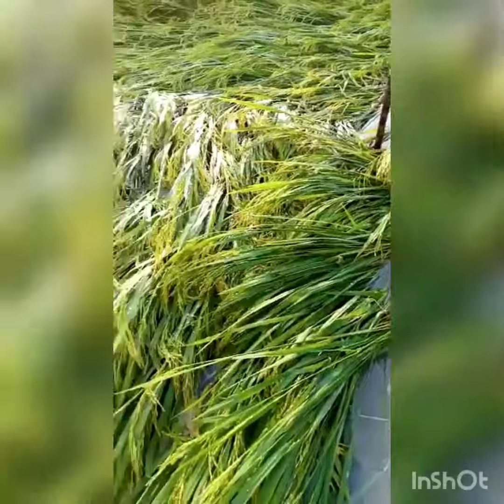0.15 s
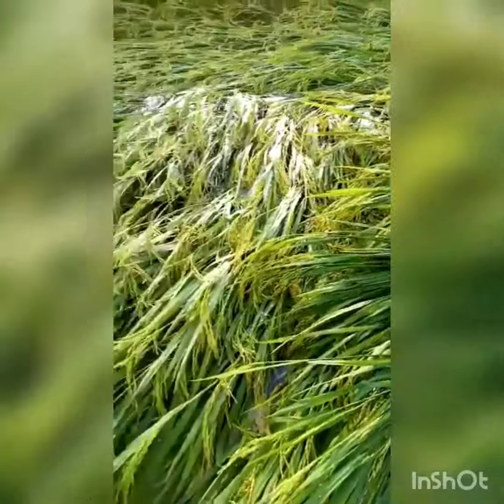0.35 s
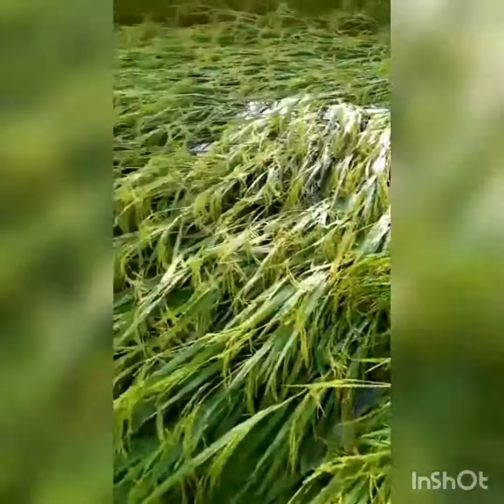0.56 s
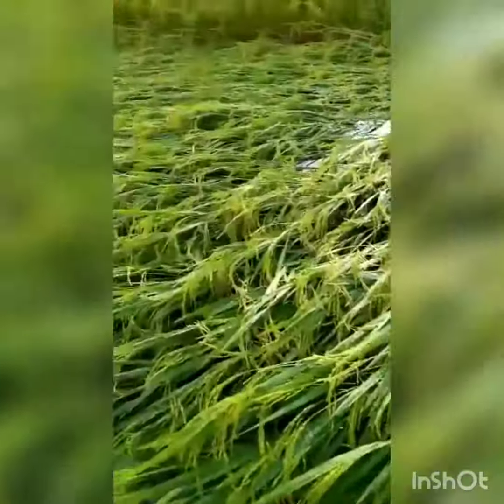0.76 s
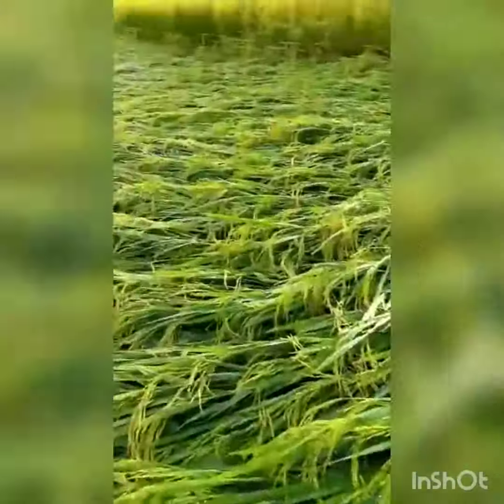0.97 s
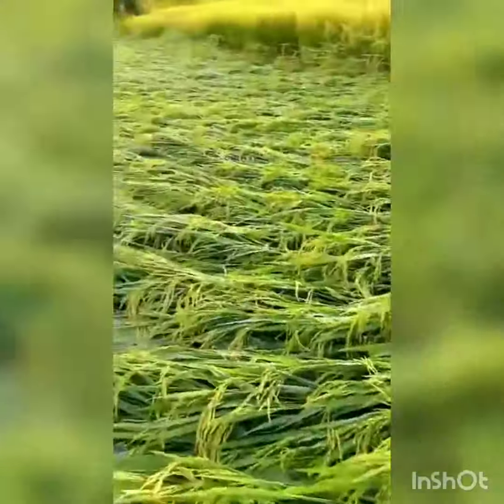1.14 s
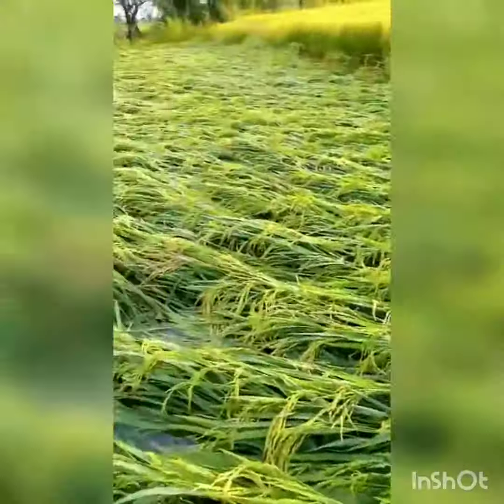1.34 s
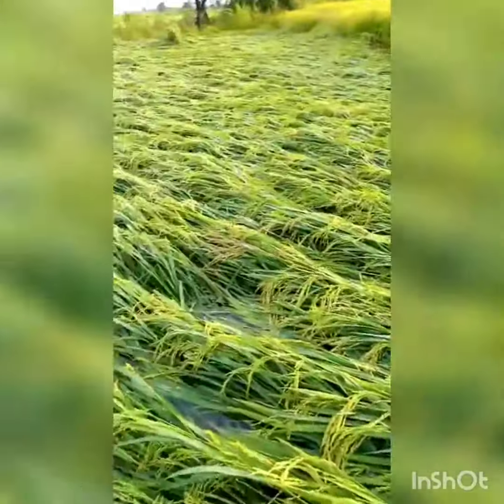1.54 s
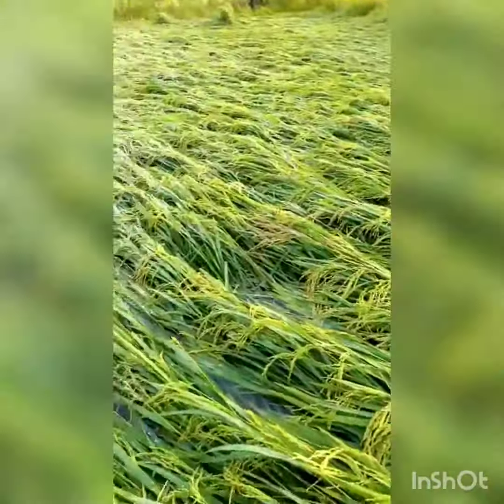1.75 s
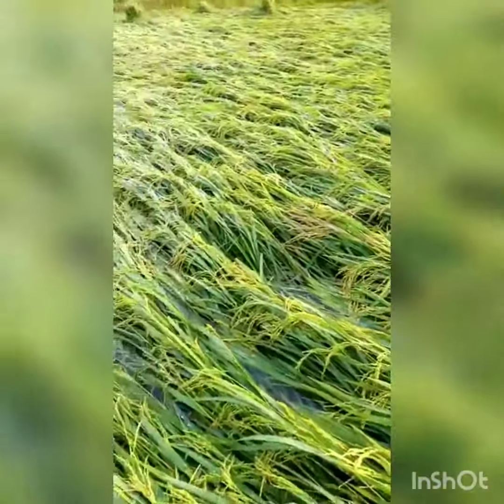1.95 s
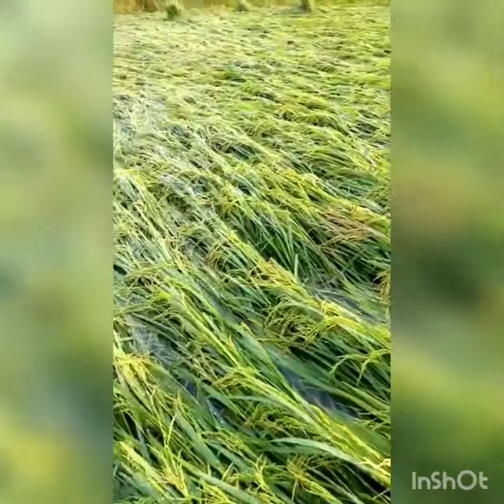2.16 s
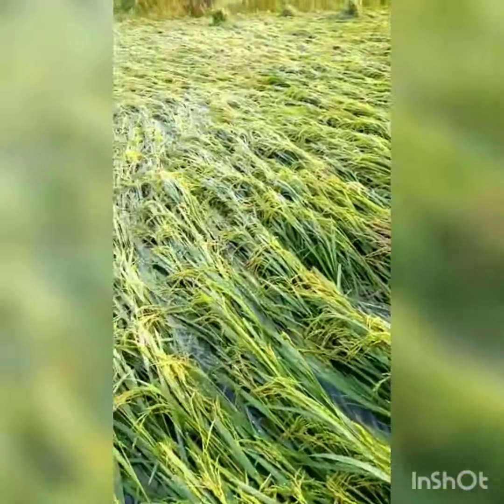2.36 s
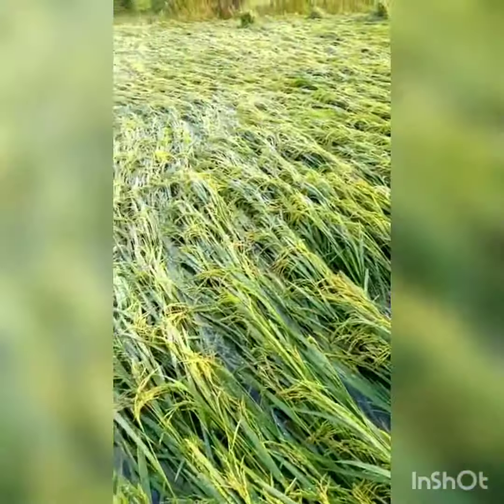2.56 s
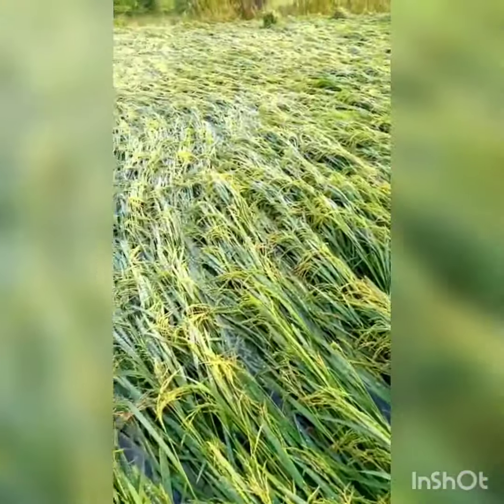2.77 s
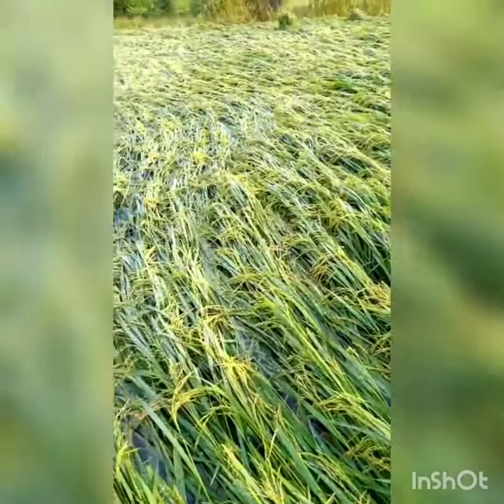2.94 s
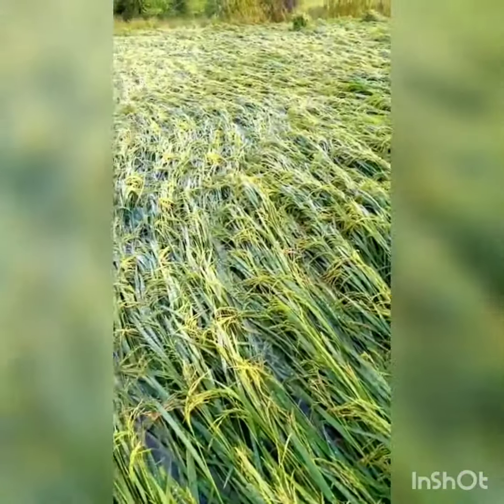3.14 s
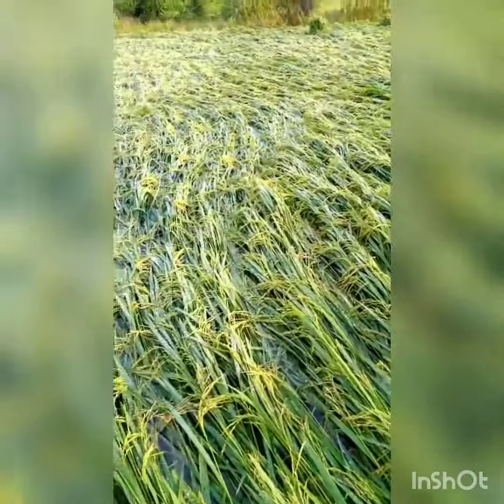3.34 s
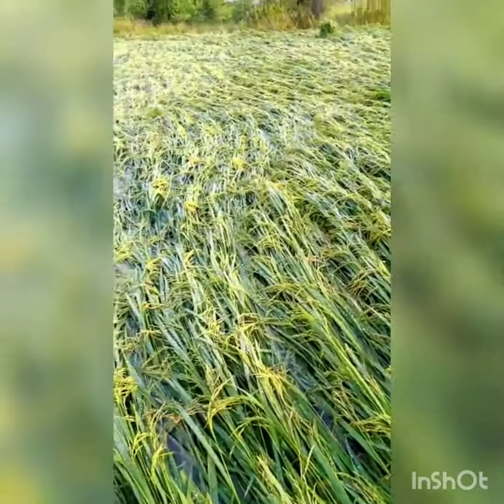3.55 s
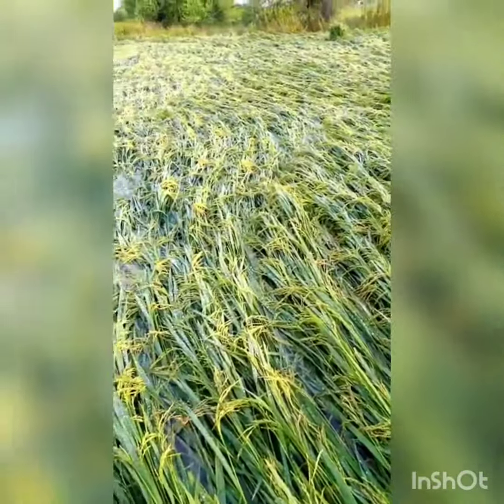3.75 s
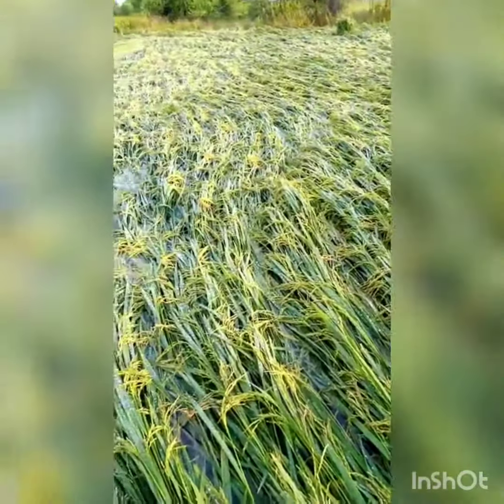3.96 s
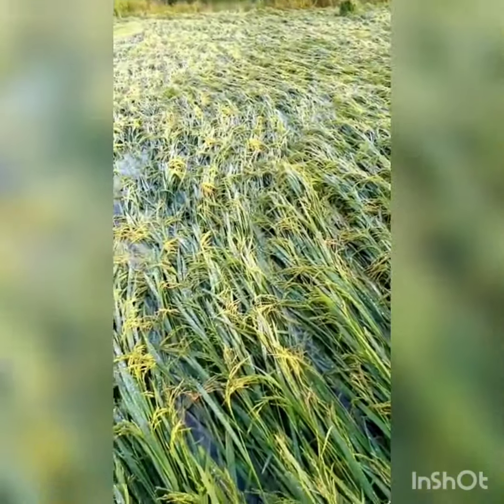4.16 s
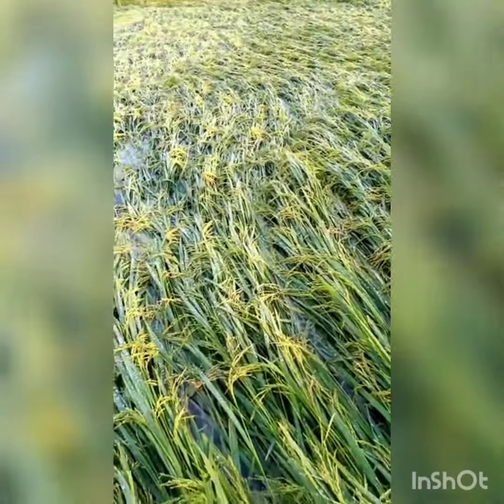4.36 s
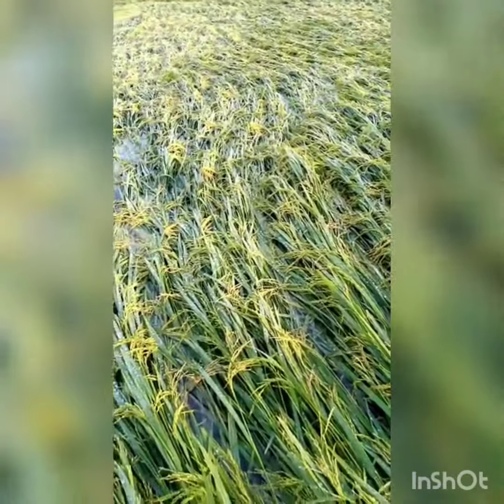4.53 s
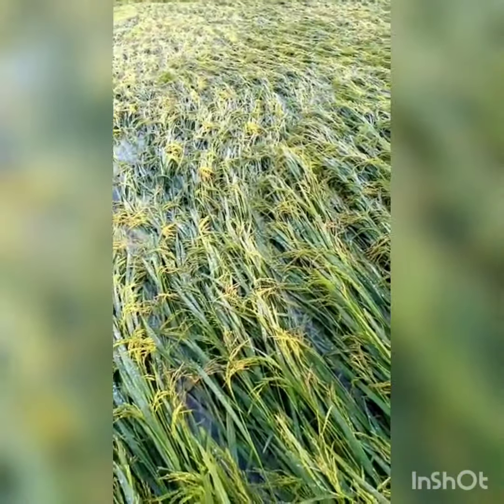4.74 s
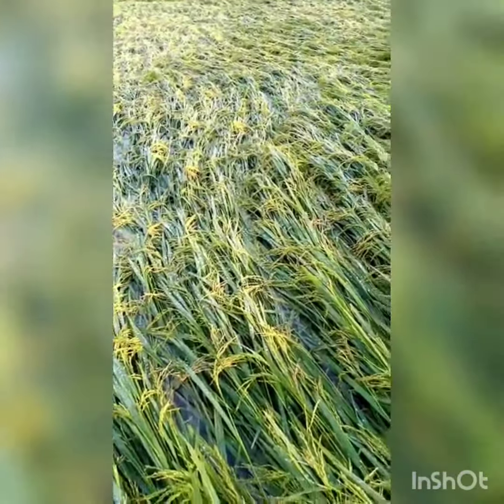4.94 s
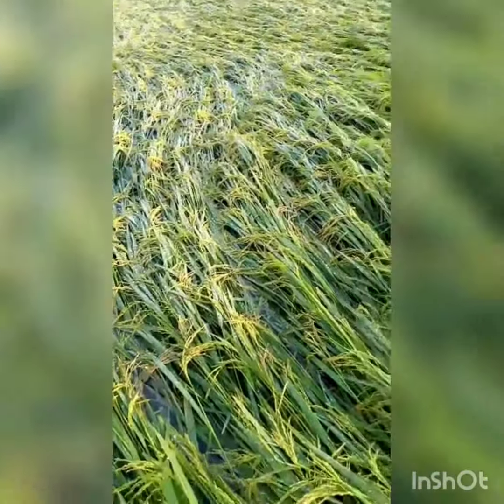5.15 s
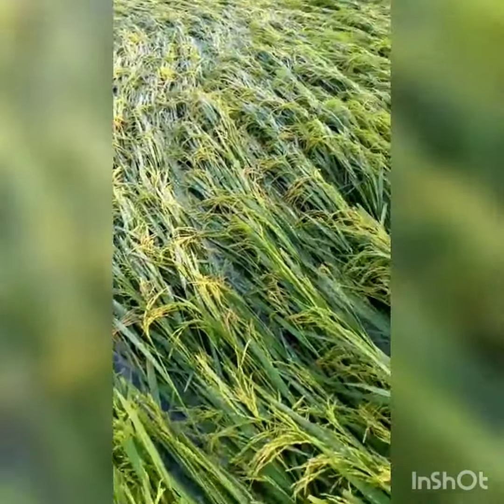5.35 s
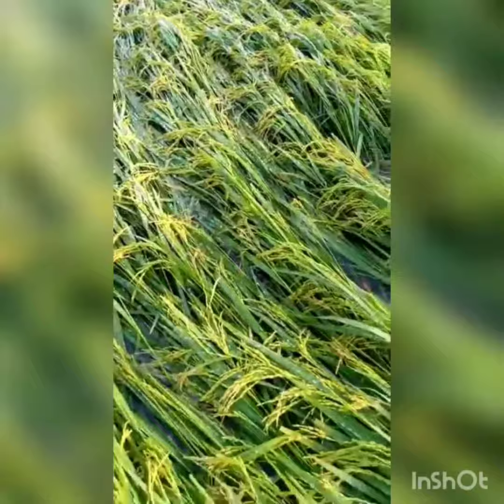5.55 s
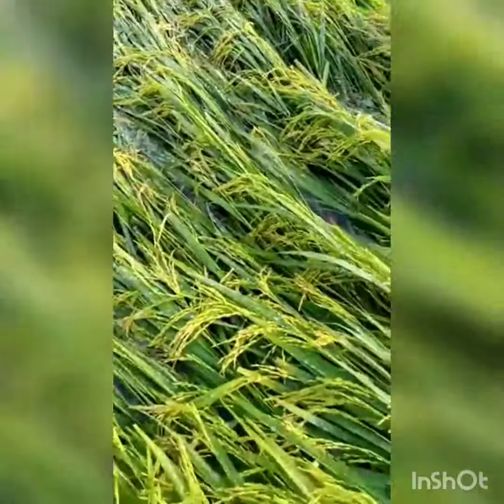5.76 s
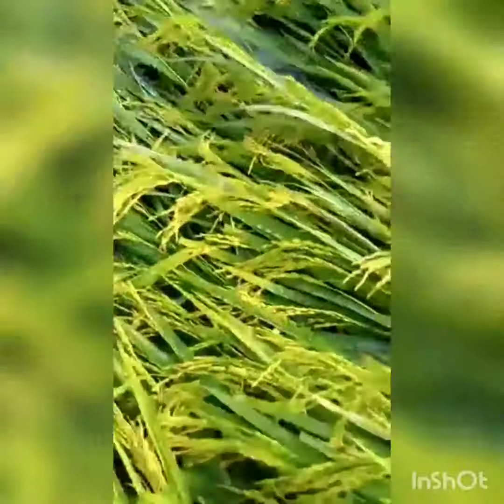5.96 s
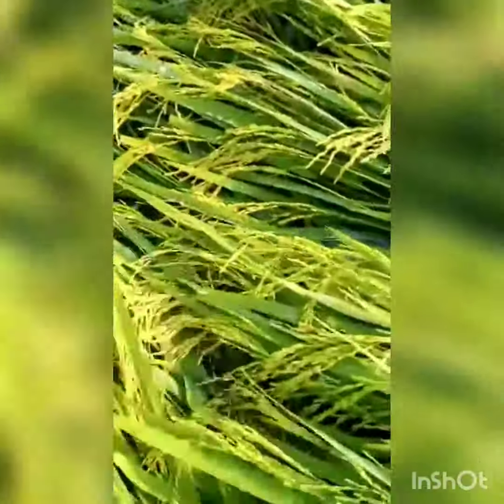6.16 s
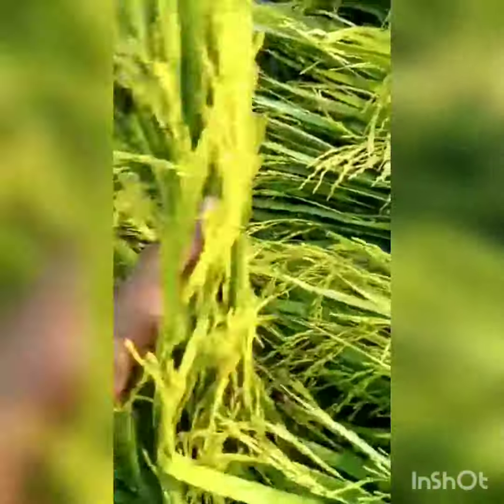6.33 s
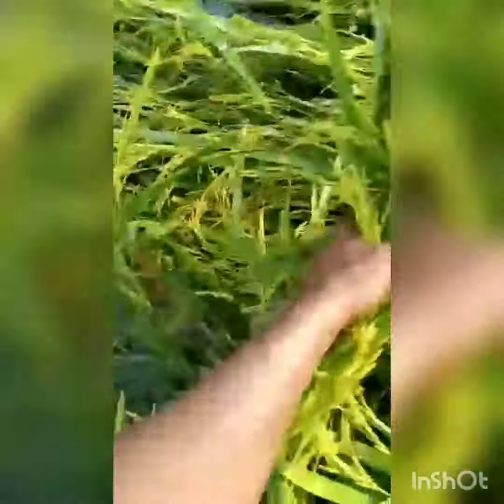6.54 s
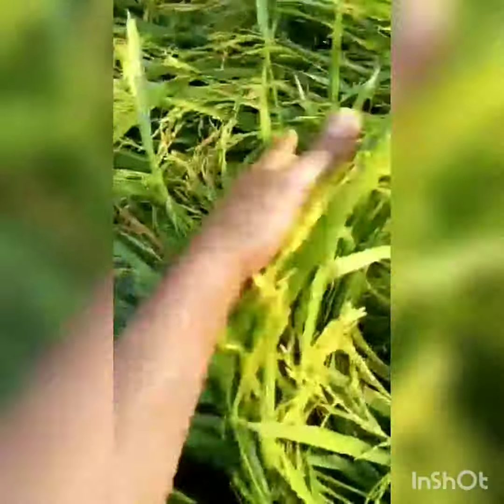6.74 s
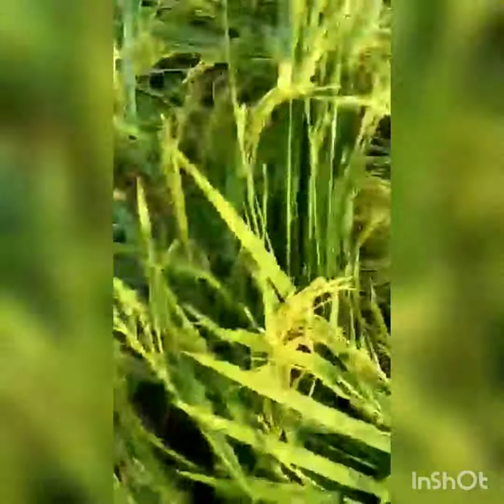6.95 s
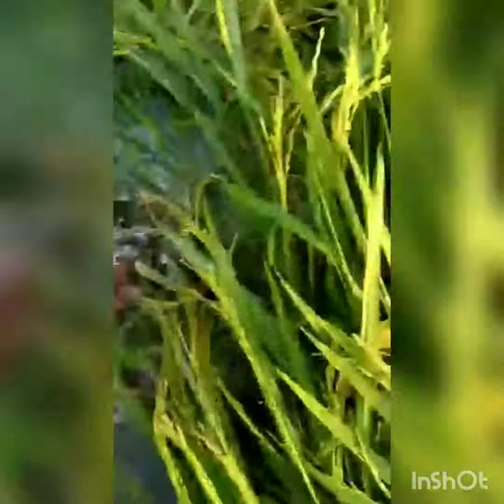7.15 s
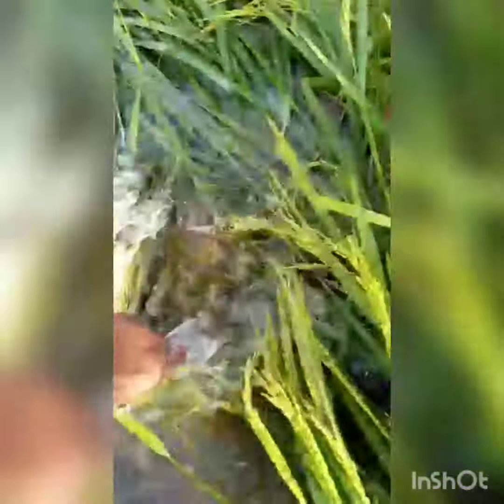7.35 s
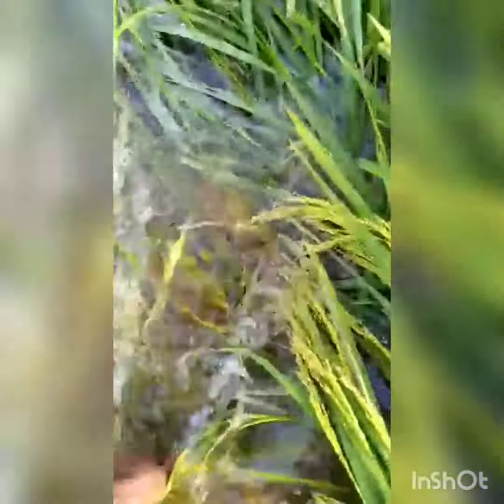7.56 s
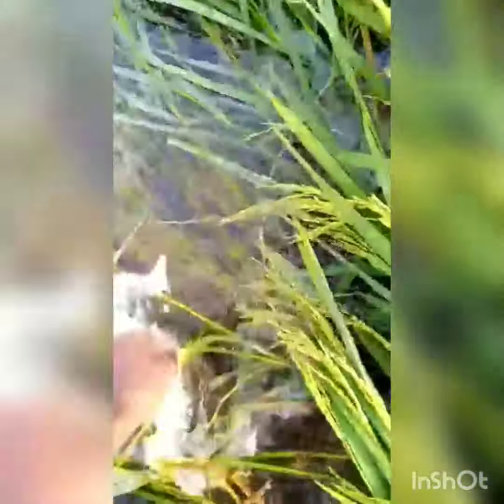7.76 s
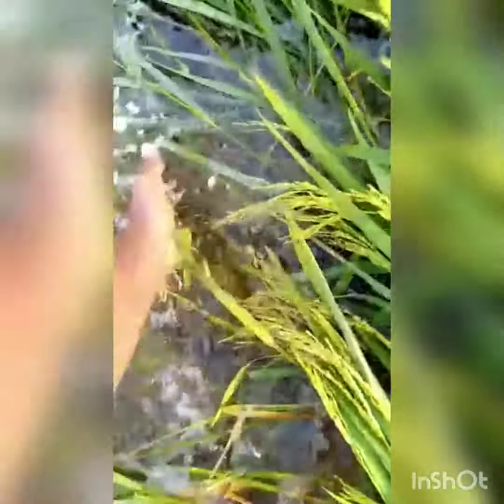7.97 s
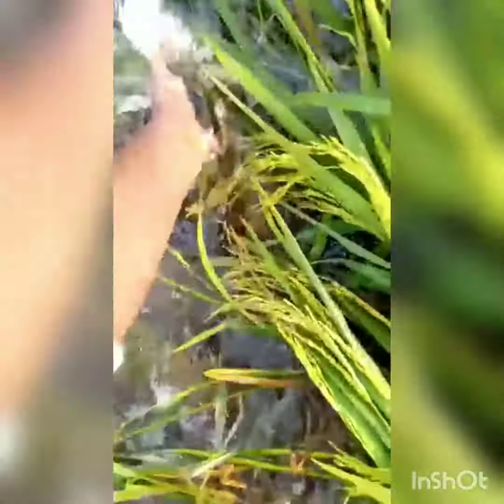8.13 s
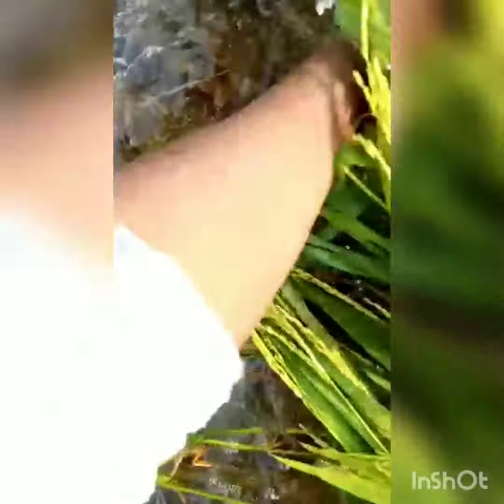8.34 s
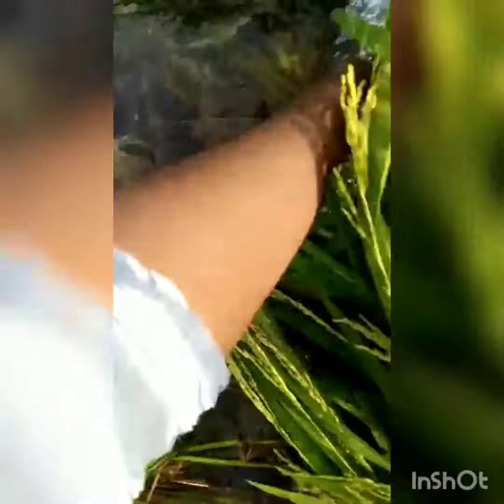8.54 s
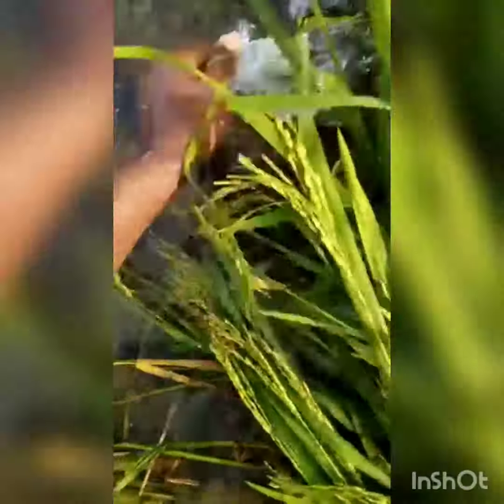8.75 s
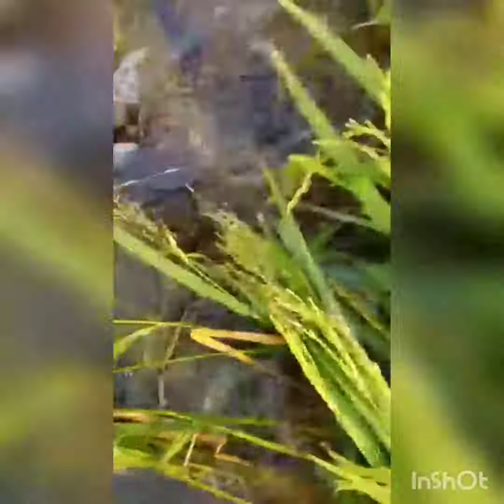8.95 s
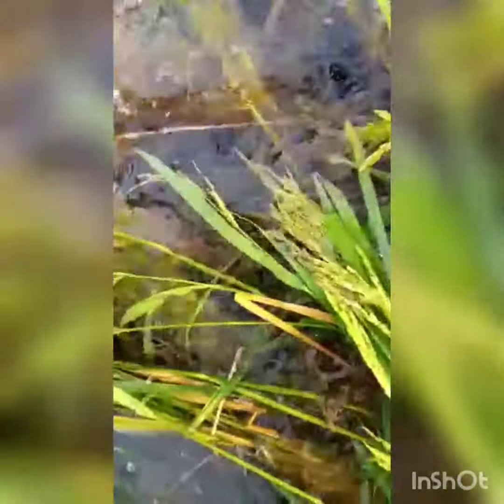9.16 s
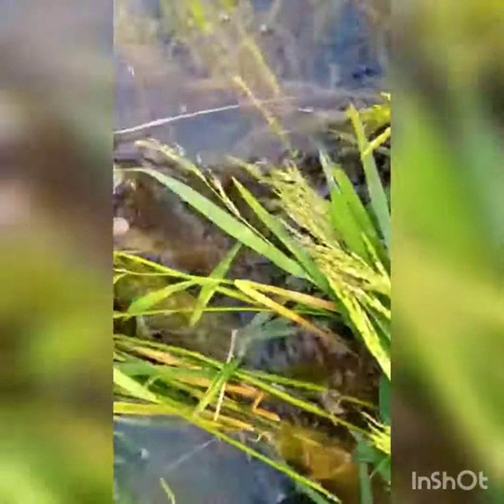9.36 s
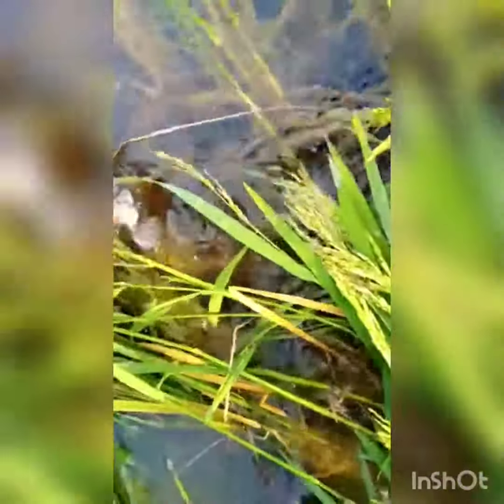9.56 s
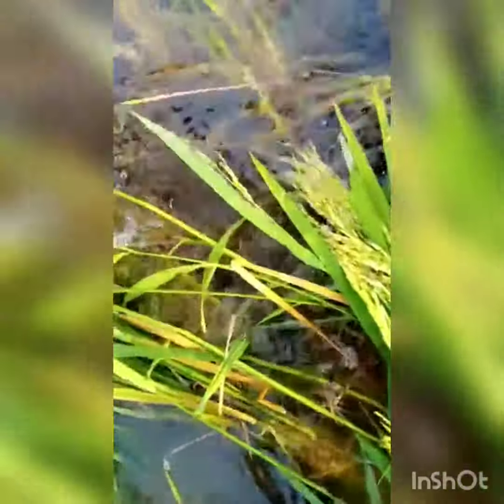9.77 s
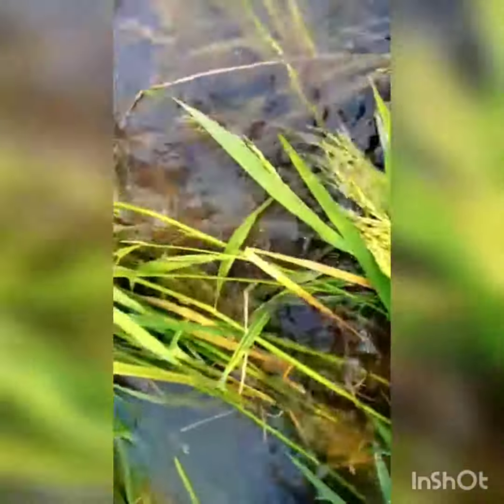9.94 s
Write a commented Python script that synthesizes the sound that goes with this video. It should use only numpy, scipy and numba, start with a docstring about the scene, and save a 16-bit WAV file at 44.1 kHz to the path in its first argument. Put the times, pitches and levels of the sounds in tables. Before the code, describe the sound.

Outdoors in a flooded rice field, a near cricket chirps rapidly and steadily, high and thin, with a lower cricket, distant insects and faint falling bird whistles behind it. Wet leaves tick and crackle softly. Just before six seconds a hand sweeps the stalks in a loud, bright swish, then paddles in shallow water with splashes, slaps, glugs and bubbles. Close, plain phone microphone, slight hiss.

```python
"""Flooded field of flattened rice, open air, one phone microphone: a near cricket chirps in beating
sine strokes; a lower cricket, noise-band crickets and a whistling bird are further off. Wet leaves
tick and brush as crackling noise. Then a hand sweeps the stalks and paddles in the shallow water:
shaped noise swishes, sprays and churns, while damped rings of rising pitch bubble, glug and slap."""
import sys
import numpy as np
from scipy import signal
from scipy.fft import rfft, irfft
from scipy.io import wavfile
from scipy.ndimage import uniform_filter1d
from numba import njit

SR = 44100
rng = np.random.default_rng(int(sys.argv[2]) if len(sys.argv) > 2 else 0)


def generate_wav(signal):
    """Clip the signal to [-1, 1] and save it as 16-bit WAV at the path in sys.argv[1]."""
    frames = np.transpose(np.atleast_2d(signal))
    scaled = np.clip(frames, -1, 1) * 32767
    pcm = np.round(scaled).astype(np.int16)
    wavfile.write(sys.argv[1], SR, pcm)


N = 441000

# spectrum of brushed stalks and leaves: freq_hz, relative_level_db
SWISH_SPECTRUM = [(410, -41), (700, -30), (958, -4), (1400, 3.5), (1600, 0.5), (2020, 1), (3370, -5),
                  (6570, -3.5), (7300, -8.5), (8100, -13), (10100, -9.5), (13500, -21), (15200, 4),
                  (16000, -11)]


def undb(db):
    """Decibels to amplitude."""
    return 10 ** (np.asarray(db) / 20)


def unit(x):
    """Scale to rms 1."""
    return x / np.sqrt(np.mean(x ** 2))


def curves(table):
    """Table columns as sample-by-sample lines, and a mask of the time covered, eased at its ends."""
    s, *columns = np.transpose(table)
    t = np.arange(N) / SR
    mask = np.clip(np.minimum(t - s[0] + 0.016, s[-1] + 0.036 - t) / 0.026, 0, 1)
    return [np.interp(t, s, c) for c in columns], mask


def band(x, lo_hz, hi_hz):
    """Steep band-pass."""
    sos = signal.butter(3, [lo_hz, min(hi_hz, .45 * SR)], "band", fs=SR, output="sos")
    return signal.sosfilt(sos, x)


def colour(x, table):
    """Shape the spectrum by (Hz, dB) points, straight lines over log frequency."""
    hz, db = np.transpose(table)
    f_hz = np.arange(N // 2 + 1) * SR / N + 1
    return irfft(rfft(x) * undb(np.interp(np.log(f_hz), np.log(hz), db)), N)


def walk(rate_hz):
    """Random levels, a new one rate_hz times a second, joined by slews; spread near 1.4."""
    k = int(SR / rate_hz)
    return 1.73 * uniform_filter1d(np.repeat(rng.standard_normal(N // k + 1), k), k)[:N]


def crackle(spread_db):
    """Noise with a few large samples among many small: dense snaps."""
    return rng.standard_normal(N) * undb(spread_db * rng.exponential(size=N))


@njit
def rings(start, hz, t60_s, size, glide, rise_cycles):
    """Damped sines that swell over rise_cycles; pitch shifts by fraction glide (up: bubble nears surface)."""
    out = np.zeros(N)
    for k in range(len(start)):
        n, phase, fade = int(t60_s[k] * SR), 0., 1.
        for i in range(min(n, N - start[k])):
            phase += hz[k] * (1 + glide * i / n) / SR
            fade *= 1 - np.log(1000) / n
            swell = min(phase / rise_cycles, 1.) ** 2
            out[start[k] + i] += size[k] * np.sin(2 * np.pi * phase) * fade * swell
    return out


def ring_table(s, db, hz, t60_s, glide, rise_cycles):
    """Rings from seconds and dB; the dB are ahead of swell and decay."""
    return rings((s * SR).astype(np.int64), hz, np.maximum(t60_s, .002), undb(db), glide, rise_cycles)


def froth(lo_hz, hi_hz, cycles, spread_db, count):
    """Random crowd of rising bubble rings in the second half, rms 1 there; largest sizes capped."""
    u = rng.random((count, 4)).T
    start_s = (1 + u[0]) * N / SR / 2
    hz = lo_hz * (hi_hz / lo_hz) ** u[1]
    db = spread_db * np.minimum(-np.log(u[2]), 2.7)
    t60_s = cycles * (.5 + u[3]) / hz
    return unit(ring_table(start_s, db, hz, t60_s, 0.43, 4.53)) / np.sqrt(2)


def bursts(s, db, decay_s):
    """A short puff of noise that swells and dies at each time."""
    snap, t = np.zeros(N), np.arange(int(9 * decay_s * SR)) / SR
    snap[((s - decay_s / 2) * SR).astype(int)] = undb(db)
    envelope = signal.fftconvolve(snap, t / decay_s * np.exp(1 - t / decay_s))[:N]
    return envelope * rng.standard_normal(N)


def air():
    """Open-air hush with the microphone's own hiss, and low noise puffs as the arm moves air onto it."""
    # hush: freq_hz, relative_level_db
    hush_spectrum = [(25, -20.5), (80, -7.5), (160, -12), (1130, -22.5), (2990, -23), (4870, -26.5),
                     (5430, -25), (6560, -2), (7310, -27), (8140, -26), (9070, -39), (12500, -43),
                     (16000, -25)]
    # puffs: time_s, level_db (before the bass filter)
    puffs = [(6.749, -44), (7.449, -33), (7.779, -33), (8.11, -34.5), (9.059, -50)]
    hush_db = -70.5 + 0.16 * walk(3.5)
    hush = unit(colour(rng.standard_normal(N), hush_spectrum)) * undb(hush_db)
    return hush + band(bursts(*np.transpose(puffs), 0.025), 44, 110)


def chorus():
    """Far crickets merge into narrow noise bands with fluttering levels."""
    # lower band: time_s, level_db
    far_levels = [(0, -70), (1.2, -84), (1.9, -69), (2.4, -75), (3.5, -74.5), (5.6, -89)]
    (far_db,), _ = curves(far_levels)
    flutter_db = 3 * walk(110) + 4 * walk(18)
    far = unit(band(rng.standard_normal(N) * undb(flutter_db), 6050, 6600)) * undb(far_db)
    high_db = -84 + 3 * walk(40) + 1.5 * walk(3)
    high = unit(band(rng.standard_normal(N), 7750, 8450)) * undb(high_db)
    return far + high


def bird():
    """Short falling sine whistles blurred by echoes from across the field, over faint distant twitter."""
    # notes: time_s, level_db (before the mix), pitch_hz (40% through the note)
    tweets = [(0.571, -66, 3230), (0.806, -64, 3220), (0.864, -61, 3050), (1.568, -68, 3170),
              (1.626, -67, 3160), (1.775, -73, 3770), (1.8437, -70, 3200), (1.9006, -67, 3150),
              (2.23, -76, 3200), (2.28, -70, 4570), (2.2937, -72, 3110), (2.615, -71, 3120),
              (2.98, -76, 3000), (3.37, -75, 3080), (3.4211, -70, 2960), (3.725, -77, 3100),
              (3.9519, -72, 3810), (4.035, -76, 3100), (4.1694, -76, 3640), (4.6694, -78, 3150),
              (4.805, -78, 3870), (4.9536, -78, 3160), (5.2007, -73.5, 3150), (5.26, -73, 3110),
              (5.325, -75, 3090)]
    out, t = np.zeros(N), np.arange(int(0.03 * SR)) / SR
    through = t / t[-1]
    for s, db, hz in tweets:
        pitch_hz = hz + 400 * (.7 + .5 * rng.random()) * (.4 - through)
        swell = np.sin(np.pi * through ** 0.58) ** 0.54
        i = int((s - .008) * SR)
        out[i:i + len(t)] += undb(db) * swell * np.sin(2 * np.pi * np.cumsum(pitch_hz) / SR)
    echoes = rng.standard_normal(6000) * np.exp(-np.arange(6000) / 1360.0)
    u = rng.random((400, 3)).T
    hz, t60_s = 2850 + 2400 * u[2] ** 3, .08 + 0.12 * u[1]
    twitter = ring_table(u[0] * N / SR, -86 + 6 * u[1] ** 2, hz, t60_s, -.1, 90.)
    twitter *= undb(3 * walk(4))
    blurred = signal.fftconvolve(out + 2 * twitter, echoes)[:N]
    return .7 * out + .8 * twitter + undb(-29) * blurred


def chirp(db, wing_hz, length_s):
    """Each wing stroke swells and stops; two wings ring a little apart and beat; pitch climbs."""
    stroke_hz, rise_hz_per_s, beat_hz = 122, 1670, 190
    t = np.arange(int((length_s + 0.0057) * SR)) / SR
    chance = rng.standard_normal((4, 12))
    stroke = np.minimum((t * stroke_hz).astype(int), 11)
    phase = t * stroke_hz % 1
    swell = np.sin(np.pi * phase ** 0.92) ** 0.69 * undb(1.8 * chance[0, stroke])
    swell *= np.clip((length_s + 0.007 - t) / 0.0048, 0, 1)
    turns = (wing_hz + 15 * chance[3, 0] + rise_hz_per_s * (t - length_s) / 2) * t
    turns += 35 * chance[1, stroke] * phase / stroke_hz  # each stroke slightly off pitch
    second_wing = np.sin(2 * np.pi * (turns - beat_hz * t) + 3 * chance[2, stroke])
    wings = np.sin(2 * np.pi * turns) + 0.5 * second_wing
    return undb(db + chance[3, 1]) * swell * wings


def crickets():
    """A near cricket and a lower one further off, in its own rhythm; leaves scatter the calls into noise."""
    # near cricket's chirps: start_s
    chirps = [0.059, 0.152, 0.256, 0.362, 0.461, 0.571, 0.679, 0.797, 0.902, 1.005, 1.13, 1.238, 1.352,
              1.455, 1.567, 1.69, 1.791, 1.89, 2.005, 2.083, 2.197, 2.295, 2.393, 2.481, 2.578, 2.676,
              2.779, 2.879, 2.983, 3.084, 3.193, 3.301, 3.409, 3.519, 3.634, 3.74, 3.845, 3.982, 4.068,
              4.179, 4.267, 4.361, 4.46, 4.558, 4.65, 4.747, 4.855, 4.953, 5.053, 5.153, 5.256, 5.36, 5.467,
              5.582, 5.686]
    # near cricket's effort: time_s, level_db, chirp_length_s
    song = [(0.102, -60, 0.049), (.26, -54.5, 0.054), (0.57, -52.5, 0.048), (0.894, -56.5, 0.032),
            (1.1, -70, 0.035), (1.7, -66, 0.03), (2.0, -60.5, 0.033), (2.08, -62, 0.04),
            (2.695, -52, 0.056), (3.298, -52, 0.04), (3.91, -55, 0.026), (4.79, -51, 0.049),
            (5.01, -52, 0.046), (5.402, -50.5, 0.046), (5.7, -53.5, 0.022)]
    # lower cricket: start_s, level_db
    answers = [(1.165, -69), (1.27, -69), (1.39, -70), (1.501, -63), (1.61, -72), (1.72, -68), (1.84, -66),
               (1.955, -65), (2.075, -65), (2.195, -64), (2.31, -62.5), (2.425, -67), (2.55, -73),
               (3.765, -72), (3.9, -70), (4.0, -67), (4.29, -69), (4.4, -65), (4.51, -67), (4.625, -69),
               (4.76, -64), (4.875, -71), (4.995, -68)]
    near_hz, answer_hz, answer_length_s = 6620, 6200, 0.055
    song_s, song_db, song_length_s = np.transpose(song)
    calls = [(s, np.interp(s, song_s, song_db), near_hz, np.interp(s, song_s, song_length_s))
             for s in chirps]
    calls += [(s, db, answer_hz, answer_length_s) for s, db in answers]
    out = np.zeros(N)
    for s, db, wing_hz, length_s in calls:
        call, i = chirp(db, wing_hz, length_s), int((s - .002) * SR)
        out[i:i + len(call)] += call
    scattered = band(rng.standard_normal(N) * np.abs(out), 6100, 6530)
    return out + 0.59 * scattered


def leaves():
    """Patchy crackle of wet blades over softer brushing, short ticks, and one blade dragging over another."""
    # gentle stirring: time_s, treble_db, body_minus_treble_db
    stirring = [(0.0, -84, 4), (0.2, -87, 4), (0.32, -75, -3), (0.55, -68, 3), (1.1, -78, 2.5),
                (1.45, -72.5, -5), (1.95, -87, 4), (2.6, -75, -3), (3.1, -76.5, -6.5), (3.45, -86, 6),
                (4.0, -84.5, -3), (4.8, -93.5, -2), (5.15, -86.5, -6), (5.34, -63.5, -4)]
    # loudest ticks: time_s, level_db (before colouring)
    ticks = [(0.3616, -41), (0.5195, -35), (0.903, -38), (0.9577, -45), (1.186, -34), (1.3688, -38),
             (1.396, -38), (1.4575, -41), (2.632, -41), (2.78, -35.5), (2.974, -38.5), (3.343, -41),
             (3.369, -42), (3.955, -47), (4.005, -46), (4.462, -44)]
    (top_db, body_db), on = curves(stirring)

    def patch(lo_hz, hi_hz):
        return unit(band(crackle(2.5), lo_hz, hi_hz)) * undb(4 * walk(90))

    bright = .35 * patch(8700, 9800) + .5 * patch(9600, 11200)
    bright += .2 * patch(11000, 14000) + .3 * patch(14200, 16000)
    rustle = colour(crackle(1.5), SWISH_SPECTRUM)

    def brushing(lo_hz, hi_hz):
        return unit(band(rustle, lo_hz, hi_hz)) * undb(2 * walk(40))

    brush = .3 * brushing(2920, 4000) + .6 * brushing(3900, 4900) + .75 * brushing(4900, 7400)
    stir = on * undb(top_db) * (bright * undb(1.9 * walk(55)) + undb(body_db) * brush)
    u = rng.random((300, 3)).T
    hz = 9000 + 6500 * u[2] ** 2.8
    faint_db = -67 - 3.5 * np.log(u[1])
    faint = ring_table(u[0] * stirring[-1][0], faint_db, hz, 40 / hz, 0.027, 6.0)
    scrape = band(bursts(np.array([4.29]), -54, 0.011), 13700, 17000)
    loud = band(colour(bursts(*np.transpose(ticks), 0.00077), SWISH_SPECTRUM), 6200, 13800)
    return stir + faint + scrape + loud


def splashes():
    """Lone air pockets, bubbles and slapping drops as damped rings; the moving surface roughens the first two."""
    # drops slapping the surface: time_s, level_db (before swell and mix), start_pitch_hz
    slap_table = [(6.0265, -25, 3000), (7.207, -20.5, 3000), (7.3193, -11, 2700), (7.4384, -19.5, 3000),
                  (7.456, -20, 2620), (7.561, -22.5, 2900), (7.7772, -23.5, 2760), (7.841, -22, 2700),
                  (7.959, -22, 2560), (7.9832, -20.5, 2500), (8.0281, -21.5, 4400), (8.045, -22.5, 3070),
                  (8.1, -24.5, 2930), (8.33, -22.5, 1850), (8.881, -22, 3860), (9.0594, -18, 3020),
                  (9.073, -9, 3640), (9.082, -16, 3930), (9.106, -22, 2930)]
    # small bubbles: time_s, level_db (before the swell, above the heard peak), start_pitch_hz
    bubble_table = [(5.925, -27.5, 1410), (6.028, -23.5, 1232), (7.267, -27, 1115), (7.317, -24, 1265),
                    (7.34, -26, 927), (7.443, -26.5, 1207), (7.498, -26, 888), (7.53, -32, 1074),
                    (7.973, -19, 1340), (8.005, -23, 1390), (8.026, -27, 1470), (8.097, -25.5, 1314),
                    (8.152, -27.5, 1195), (8.326, -20, 1320), (8.44, -22.5, 1394), (8.699, -27, 956),
                    (8.911, -25.5, 1470), (8.925, -25, 1475), (8.947, -17.5, 1273), (8.973, -19.5, 1560),
                    (9.055, -19.5, 1400), (9.131, -22, 1440), (9.148, -23, 1385), (9.2, -35, 1137),
                    (9.628, -26, 1500)]
    # large air pockets: time_s, level_db (before the swell), start_pitch_hz, t60_cycles (of start pitch)
    glug_table = [(1.585, -71, 582, 120), (7.317, -30.5, 243, 60), (7.428, -33.5, 460, 58),
                  (7.452, -30, 596, 30), (7.498, -26.5, 750, 29), (7.579, -35, 544, 34),
                  (7.615, -30.5, 451, 40), (7.725, -36.5, 455, 28), (7.856, -37.5, 405, 35),
                  (7.961, -22, 456, 14), (8.225, -26, 454, 23), (8.269, -32.5, 407, 54),
                  (8.33, -19, 423, 7.3), (8.3295, -15, 920, 9.6), (8.41, -31, 446, 78),
                  (8.46, -34, 296, 56), (8.561, -38, 415, 37), (8.611, -30, 602, 31), (8.863, -30, 704, 22),
                  (8.905, -29, 283, 11.5), (8.97, -35, 395, 34), (9.053, -33.5, 404, 31),
                  (9.056, -41.5, 203.4, 51), (9.096, -37.5, 268, 52), (9.17, -45.5, 237.4, 113),
                  (9.334, -34, 382, 14), (9.344, -40.5, 244, 25), (9.642, -19.5, 409, 8),
                  (9.713, -35, 376, 33), (9.8, -42.5, 392, 21)]
    s, db, hz = np.transpose(slap_table)
    slaps = 0.81 * ring_table(s, db, hz, 30 / hz, 0.062, 2.4)
    slaps += 0.44 * band(bursts(s, db, 0.0021), 1900, 4900)
    slaps += 0.06 * band(bursts(s, db, 0.0013), 8000, 17000)
    s, db, hz = np.transpose(bubble_table)
    bubbles = ring_table(s, db, hz, 55 / hz, 0.18, 7.9) * (.85 + .35 * walk(400))
    bubbles += 0.48 * band(bursts(s, db, 0.0033), 870, 1910)  # the film bursts
    s, db, hz, cycles = np.transpose(glug_table)
    glugs = ring_table(s, db, hz, cycles / hz, 0.297, 1.72) * (1 + 0.3 * walk(150))
    return slaps + bubbles + glugs


def strokes():
    """Amplitudes of light and deep churn: they swell towards each hand stroke and die away after it."""
    # strokes through stalks and water: time_s, light_churn_db, deep_churn_db
    stroke_table = [(6.2, -46, -71), (6.75, -56, -54), (7.33, -44, -47.5), (7.47, -44.5, -51),
                    (7.62, -53, -64), (8.12, -47, -89), (8.22, -47, -46.5), (8.38, -46, -43.5),
                    (8.62, -47.5, -64), (8.941, -40.5, -55), (9.06, -51, -48.5), (9.66, -52.5, -53.5)]
    attack_s, release_s = 0.052, 0.097
    s, *db = np.transpose(stroke_table)
    coarse_s = np.arange(0, N + 200, 200) / SR
    late_s = coarse_s - s[:, None]
    shape = np.exp(-np.where(late_s < 0, -late_s / attack_s, late_s / release_s))
    return [np.interp(np.arange(N) / SR, coarse_s, level) for level in undb(db) @ shape]


def hand():
    """Stalks swish and spray fizzes as crackling noise; water churns as ragged noise and bubble crowds."""
    # sweep: time_s, swish_db, spray_above_swish_db
    sweep = [(5.3, -83, 15), (5.45, -72, 5), (5.62, -56.5, -5), (5.86, -51.5, -1.5), (5.885, -49.5, 5),
             (6.03, -43, 1), (6.22, -34, -3), (6.5, -41.5, -0.5), (7.15, -41, -1), (7.46, -38, -4),
             (7.7, -41, -2.5), (8.08, -46.5, -4.5), (8.22, -40, -2.5), (8.41, -38, -2.5), (8.55, -42, -3),
             (8.9, -43.5, -5), (9.04, -45.5, -7), (9.12, -44.5, -4.5), (9.25, -44.5, -2), (9.45, -44.5, -1),
             (9.62, -47.5, -3), (9.85, -44, -7), (10.0, -42, 0)]
    # lower part of the swish: time_s, above_the_rest_db
    low_swish = [(5.3, -1.5), (6.0, -4.5), (6.24, -7), (7.0, -6), (7.6, -3.5), (8.25, -7), (8.6, -3),
                 (9.1, -6), (9.35, -11), (9.62, -5), (9.86, -8.5), (10, -5)]
    gate_s, dip_s = 4.6, 7.1  # churn gate, fully open before the sweep begins; hand reaches the water
    light_above_swish_db, deep_above_swish_db = -11.5, -19
    (swish_db, spray_db), on = curves(sweep)
    gate, wet = (np.clip((np.arange(N) / SR - s) / 0.11, 0, 1) for s in (gate_s, dip_s))
    fizz = colour(crackle(1.0) * undb(0.66 * walk(50) + .5 * walk(14)), SWISH_SPECTRUM)

    (low_db,), _ = curves(low_swish)
    low = unit(band(fizz, 1590, 2954)) * undb(1.2 * walk(30))
    low += 0.5 * froth(1650, 2727, 25.0, 2.5, count=3000)
    swish = undb(low_db) * low + 0.8 * unit(band(fizz, 2900, 5900))
    swish += 0.45 * froth(2900, 6500, 27.0, 3.6, count=6000)
    swish += 0.26 * wet * froth(2440, 6800, 45, 5, count=300)  # lone droplets

    spray = unit(band(fizz, 6970, 14470)) * undb(0.99 * walk(9))
    spray += 0.39 * froth(8430, 11670, 77, 2.7, count=4000)
    spray += 0.095 * wet * froth(8100, 17000, 23, 4.3, count=250)

    ragged_db = 1.2 + 1.6 * wet  # water churns more unevenly than stalks brush
    small = 0.98 * unit(band(fizz, 680, 1950)) * undb(ragged_db * walk(70))
    small += (0.43 + 0.5 * wet) * froth(668.7, 1682, 41.7, 5.2, count=3500)
    large = .75 * unit(band(rng.standard_normal(N), 240, 680)) * undb(ragged_db * walk(40))
    large += .9 * wet * froth(280, 780, 34, 3.5, count=2000)

    light, deep = strokes()
    light = np.hypot(gate * undb(swish_db + light_above_swish_db), light)
    deep = np.hypot(gate * undb(swish_db + deep_above_swish_db), deep)
    return on * (undb(swish_db) * (swish + undb(spray_db) * spray) + light * small + deep * large)


def scene():
    """Everything reaches one microphone; both channels are alike."""
    mono = air() + chorus() + bird() + crickets() + leaves() + splashes() + hand()
    return np.tile(mono, (2, 1))


def record(dry):
    """The phone cuts the top with a steep elliptic low-pass."""
    top_hz, ripple_db, stop_db = 15850, .2, 75
    return signal.sosfilt(signal.ellip(10, ripple_db, stop_db, top_hz, fs=SR, output="sos"), dry)


dry = scene()
out = record(dry)
generate_wav(out)
```